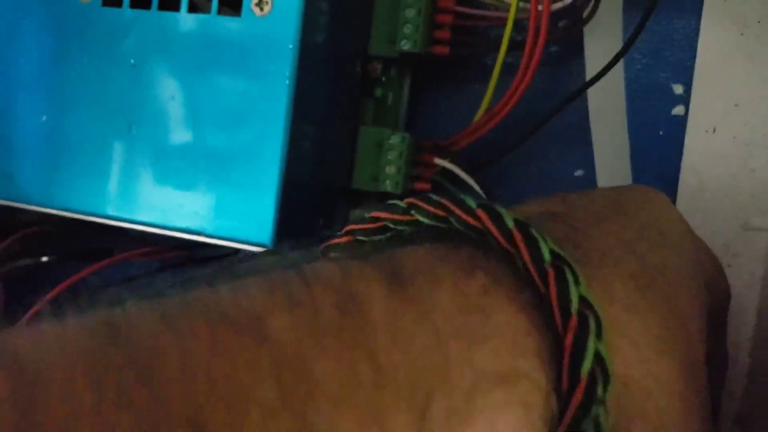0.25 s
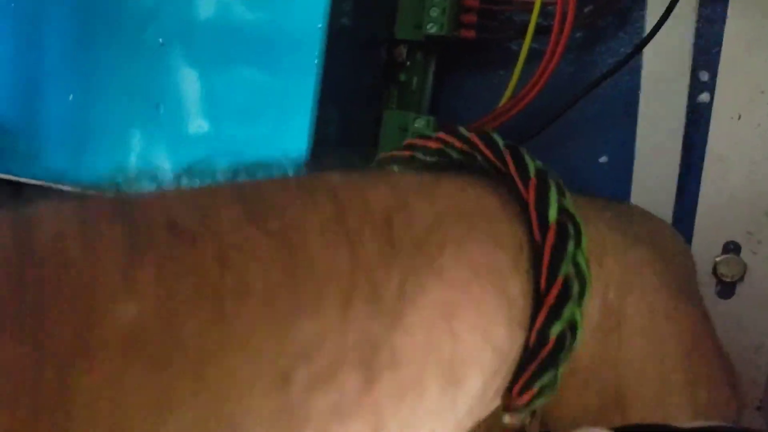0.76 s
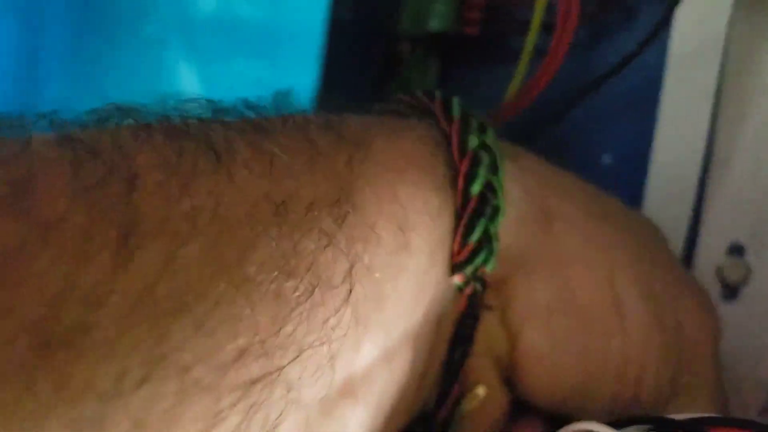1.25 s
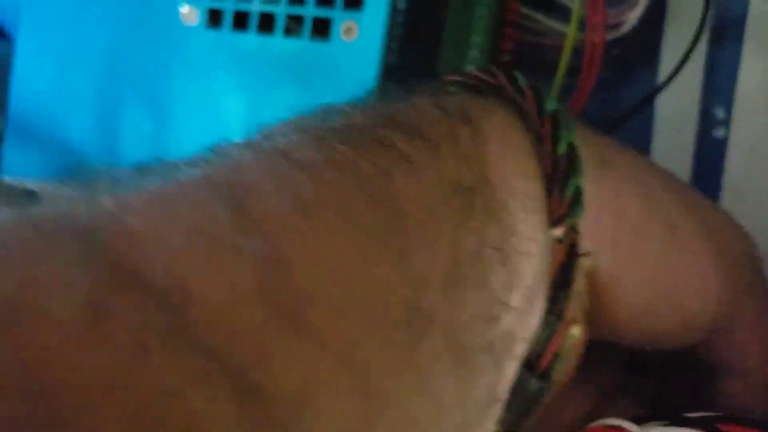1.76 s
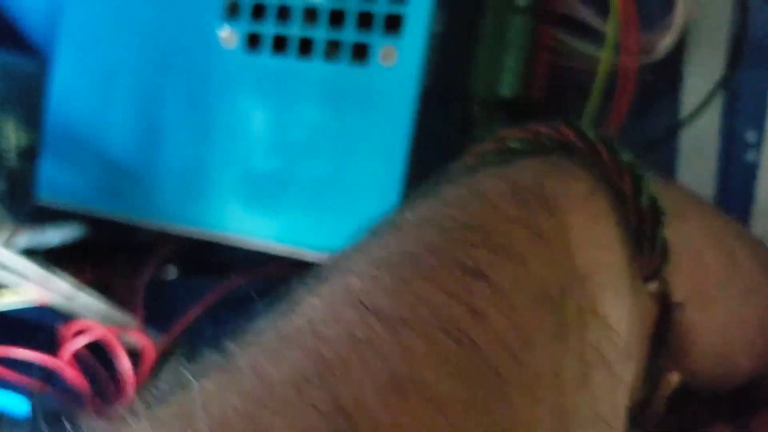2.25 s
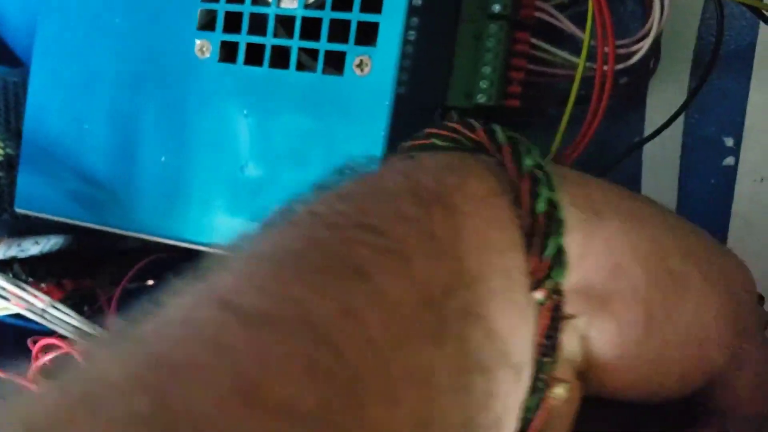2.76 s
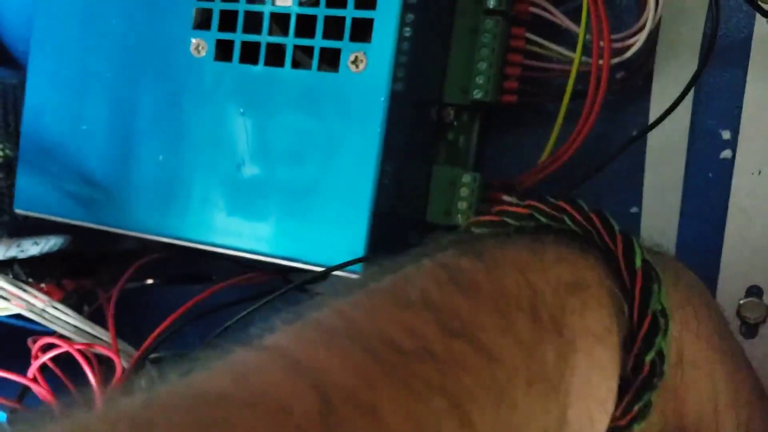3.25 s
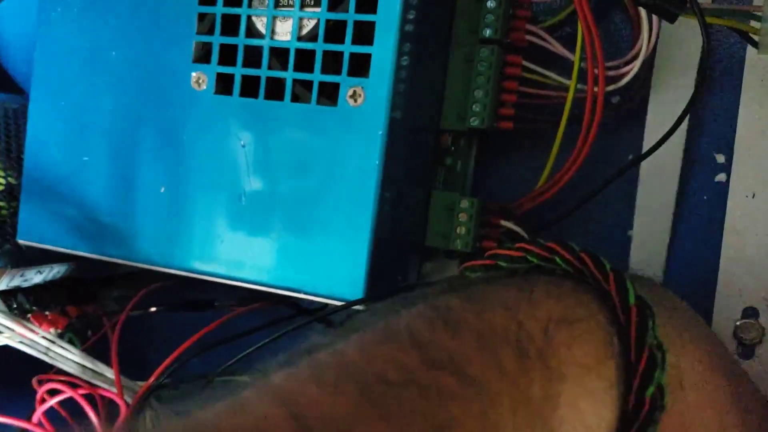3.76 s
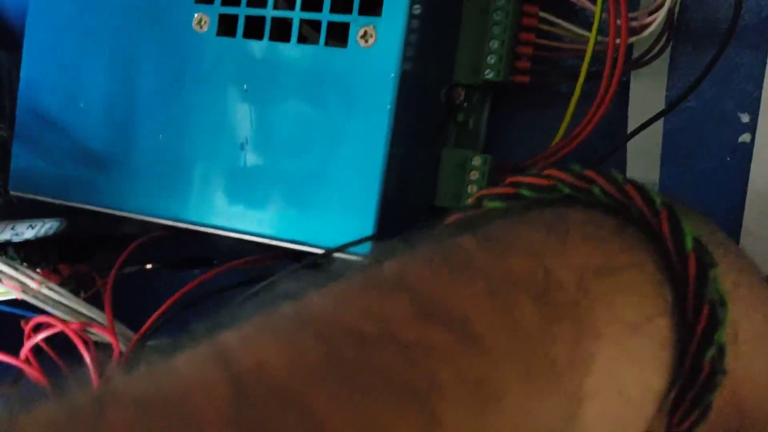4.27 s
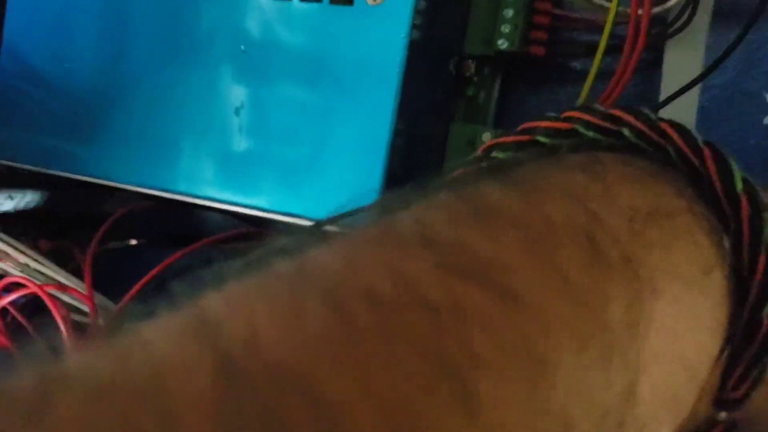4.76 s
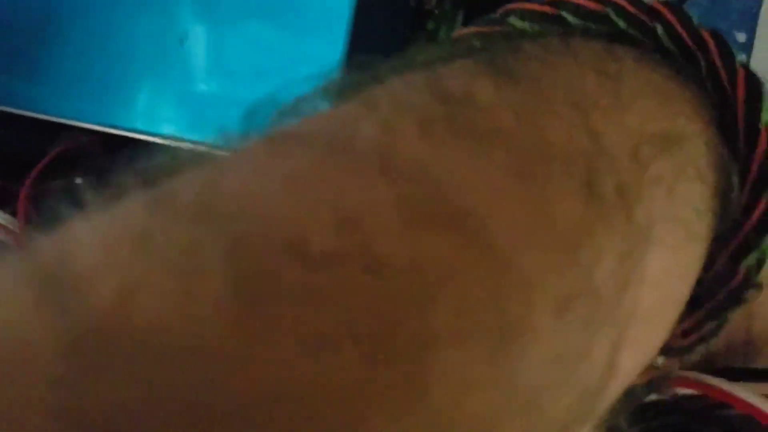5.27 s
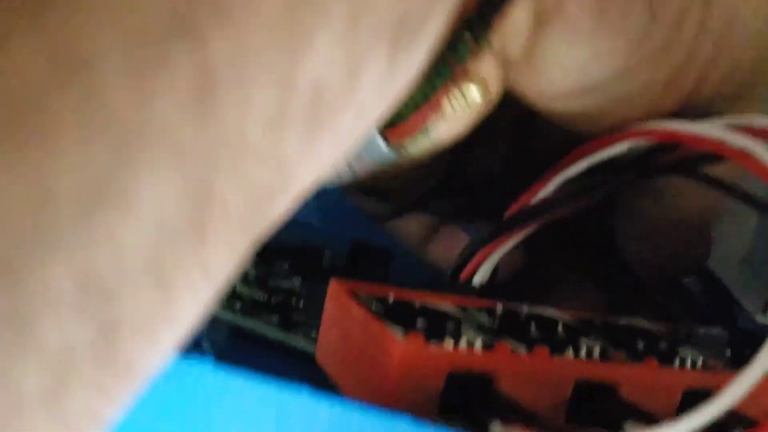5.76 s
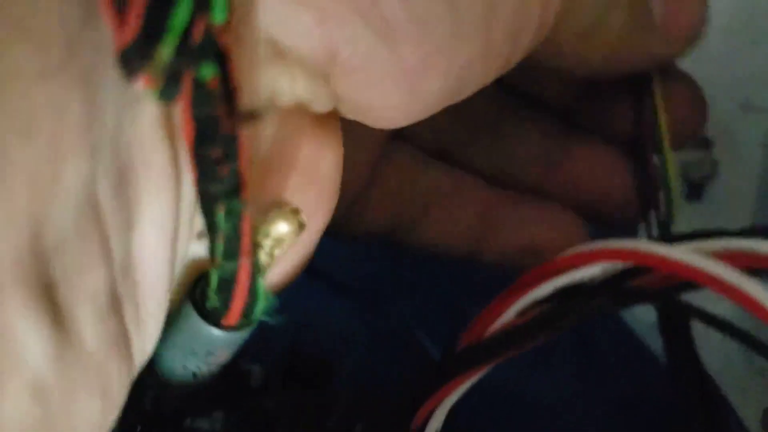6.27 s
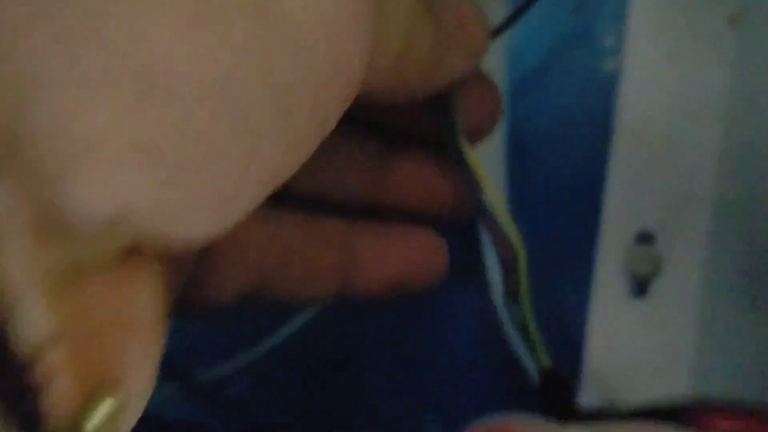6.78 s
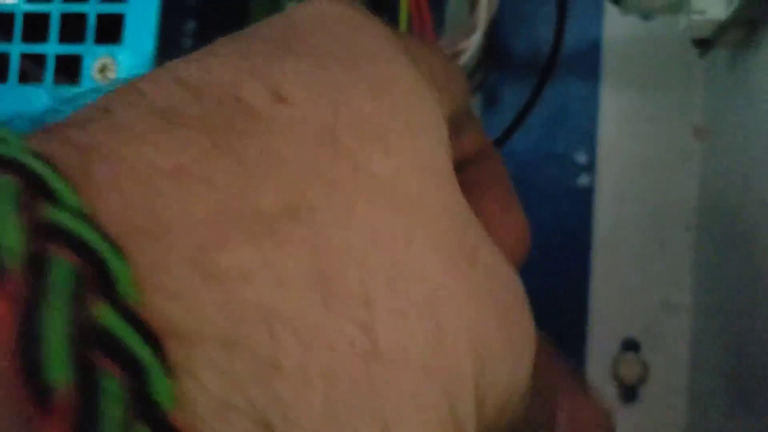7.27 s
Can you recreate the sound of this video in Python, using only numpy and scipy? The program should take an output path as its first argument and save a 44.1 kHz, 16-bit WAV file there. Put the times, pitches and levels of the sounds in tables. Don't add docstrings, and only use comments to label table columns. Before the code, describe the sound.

Very close stereo handling noise inside a hollow sheet-metal case. A hard plug slam comes early, then sparse clacks, soft shoves, wire ticks and cable rustle. Activity thickens after four and a half seconds into loud clacks and metallic knocks, peaking just before six, then thins to faint touches. Far engines hum low under slight hiss.

```python
import sys
import numpy as np
from scipy import signal
from scipy.fft import rfft, irfft, next_fast_len
from scipy.io import wavfile
from scipy.ndimage import uniform_filter1d, map_coordinates

SR = 44100
rng = np.random.default_rng(int(sys.argv[2]) if len(sys.argv) > 2 else 0)


def attenuation_scalar(level_db):
    decades = np.asarray(level_db, float) / 20
    return 10 ** decades


def pcm_store(signal):
    levels = np.round(np.clip(np.atleast_2d(signal), -1, 1) * 32767)
    wavfile.write(sys.argv[1], SR, levels.astype(np.int16).T)


N = 331632


def unit(x):
    return x / np.sqrt(np.mean(x ** 2) + 1e-20)


def along(points, hz):
    f, v = np.transpose(points)
    return np.interp(np.log(hz + 1), np.log(f + 1), v)


def curves(rows):
    s, *cols = np.transpose(rows)
    return [np.interp(np.arange(N) / SR, s, c) for c in cols]


def wobble(rate):
    knots = rng.standard_normal(int(N * rate / SR) + 4)
    return map_coordinates(knots, [np.arange(N) * rate / SR])


def filtered(x, response):
    n = x.shape[-1]
    m = next_fast_len(n + 2048)
    return irfft(rfft(x, m) * response(np.fft.rfftfreq(m, 1 / SR)), m)[..., :n]


def body(modes, bed, spread_db=0):
    gains = attenuation_scalar(spread_db * rng.standard_normal(len(modes)))

    def response(f):
        total = attenuation_scalar(along(bed, f))
        for k, (gain, (hz, width, db)) in enumerate(zip(gains, modes)):
            peak = 1j * f * width / (hz * hz - f * f + 1j * f * width)
            total = total + (-1) ** k * gain * attenuation_scalar(db) * peak
        return total
    return response


def ports(force, response, alike, lead_s):
    a, b = force * rng.standard_normal((2, len(force)))
    turn = np.arccos(np.clip(alike, 0, 1)) / 2
    pair = np.cos(turn) * a + np.sin(turn) * np.array([b, -b])
    sides = np.array([[1], [-1]])
    return filtered(pair, lambda f: response(f) * np.exp(1j * np.pi * f * lead_s * sides))


def lean(db):
    return attenuation_scalar([[db / 2], [-db / 2]])


# t/s, share of the full lead at the left port
HAND_PLACE = [
    (0, .2),
    (.7, 1),
    (1.2, .3),
    (2.2, .1),
    (4.2, .1),
    (5, .9),
    (5.8, 1),
    (6.3, .5),
    (7.5, .3),
]


def hand_share(s):
    return np.interp(s, *np.transpose(HAND_PLACE))


def contact(out, s, db, hz, fade, pan_db, modes, bed, alike, lead_s, crack, focus_db,
            rise=.0022, slope_db=2.5, swell=0, size=SR // 5):
    t = np.arange(size) / SR
    bumps = np.repeat(rng.standard_normal(size // 60 + 1), 60)[:size]
    shape_db = -60 * np.maximum(t - swell, 0) / np.clip(fade, .01, .25)
    shape_db -= 33 * np.maximum(swell - t, 0) / (swell + 1 / SR)
    force = attenuation_scalar(shape_db + 3.35 * bumps) * (1 - np.exp(-t / rise)) ** 2
    force += crack * attenuation_scalar(-60 * t / 0.015)
    ring = body(modes, bed, spread_db=1.9)

    def focused(f):
        away = np.log((f + 1) / hz)
        return ring(f) * attenuation_scalar(focus_db * np.exp(-(away / 0.12) ** 2) - slope_db * abs(away))
    part = ports(force, focused, alike, lead_s * hand_share(s))
    peak = np.sqrt(uniform_filter1d(np.mean(part ** 2, 0), size=130).max())
    start = round((s - .3 * rise - swell) * SR)
    out[:, start:start + size] += attenuation_scalar(db - 7.0) * part / peak * lean(pan_db)


# f/Hz, width f/Hz, level/dB
METAL = [(577, 18, -12), (596.7, 22, -3.5), (760, 47, -0.5), (793, 12, -6.5), (807, 23, -9.5),
         (874, 49, 3.5), (957, 29, -8.5), (1071, 18, 4), (1180, 280, -6), (1266, 78, 2), (1340, 140, -16.5),
         (1618, 62, -13.5)]
# f/Hz, level/dB
METAL_BED = [(250, -39.5), (450, -1.5), (800, -2.5), (1600, -10), (2500, -31.5)]
# f/Hz, width f/Hz, level/dB
BOOM_MODES = [(167, 27, -16.5), (220.5, 15, 3.5), (254, 38, -2.5), (300.2, 26, 3), (393, 31, -9.5)]
# f/Hz, level/dB
BOOM_SMOOTH = [(90, -36), (200, -8.5), (350, -18), (700, -57)]
# t/s, peak level/dB, loudest f/Hz, fade by 60 dB t/s, boom level/dB re peak
PANEL_KNOCKS = [(0.42, -38, 760, 0.13, 0), (1.563, -41, 1020, 0.28, 3.5), (1.672, -28, 902, 0.12, -11.5),
                (2.446, -37.5, 1180, 0.3, -3.5), (3.186, -37.5, 748, 0.1, -2), (3.56, -48, 1350, 0.13, -29),
                (3.899, -42.5, 799, 0.085, -6), (4.083, -48, 766, 0.13, 1.5),
                (4.355, -46.5, 880, 0.31, 4.5), (4.501, -43.5, 770, 0.11, 5), (4.614, -39.5, 988, 0.12, -6),
                (4.771, -43.5, 746, 0.032, -4), (5.035, -45.5, 1324, 0.086, -18),
                (5.201, -41, 743, 0.057, -1), (5.472, -27.5, 740, 0.15, -2), (5.547, -36, 813, 0.09, -13.5),
                (5.701, -30, 1464, 0.15, -5), (5.749, -32, 727, 0.27, -6), (5.844, -40, 724, 0.028, -2.5),
                (6.295, -37.5, 1000, 0.1, -1.5), (6.329, -37, 1130, 0.14, -3),
                (6.914, -51, 780, 0.063, -22)]
# t/s, peak level/dB, fade by 60 dB t/s, first bounce loss level/dB,
# boom level/dB re peak
PLUG_SLAMS = [
    (0.646, -25, 0.023, 1.5, -10),
    (5.113, -23, 0.05, 1.5, -4),
]


def knocks(out):
    bounce_s, slam_hz = .0155, 1000
    blows = list(PANEL_KNOCKS)
    for s, db, fade, loss_db, boom_db in PLUG_SLAMS:
        for k in range(3):
            blows.append((s + k * bounce_s, db - loss_db * k * k, slam_hz, fade, boom_db))
    for s, db, hz, fade, boom_db in blows:
        contact(out, s, db, hz, fade, 5.0, METAL, METAL_BED, .96, .00012, .7, 3.0)
        contact(out, s, db + boom_db + 0.5, 260, fade, 4.5, BOOM_MODES, BOOM_SMOOTH, .98, .0001, .2, 0)


# f/Hz, width f/Hz, level/dB
PLASTIC_MODES = [(1532, 24, -4.5), (1890, 110, -2.5), (2120, 110, -6.5), (2306, 26, -2), (2380, 66, -7),
                 (2562, 120, -1.5), (2651, 210, -9.5), (2894, 33, -1), (3460, 190, -15.5),
                 (3920, 330, -5.5), (4534, 180, -16.5)]
# f/Hz, level/dB
PLASTIC_SMOOTH = [(800, -21.5), (1500, -10), (3000, -10), (5000, -18.5), (8000, -27)]
# t/s, peak level/dB, loudest f/Hz
PLUG_CLACKS = [(0.052, -46, 2400), (0.07, -46, 1900), (6.838, -60, 1600), (7.287, -54, 1700),
               (2.408, -43.5, 2500), (2.482, -44.5, 1700), (2.3407, -54, 1600), (2.3502, -47, 2480),
               (2.676, -54.5, 2380), (5.4254, -34.5, 2230), (0.3547, -47, 2060), (0.422, -43, 2100),
               (0.6525, -22.5, 1842), (0.6654, -34.5, 2200), (0.797, -38, 2770), (0.819, -42, 2820),
               (1.5613, -39.5, 2400), (1.667, -28, 2360), (1.6836, -30.5, 2620), (2.4656, -41, 2400),
               (3.182, -44.5, 2120), (3.2539, -43.5, 2860), (3.7737, -54, 2060), (3.902, -52, 2470),
               (4.8112, -44, 2490), (5.0729, -35, 2450), (5.1994, -34.5, 1940), (5.5253, -29.5, 1890),
               (6.0792, -36.5, 2205), (6.2898, -35, 2150), (6.4638, -44.5, 2580), (6.6316, -48, 3620)]
# t/s, peak level/dB, loudest f/Hz, fade by 60 dB t/s,
# wire level/dB re peak
PLUG_SNAPS = [(0.6462, -16.5, 1723, 0.046, -4.5), (0.7185, -32, 2335, 0.036, -0.5),
              (2.3803, -38, 2550, 0.15, -7.5), (2.4438, -38, 2546, 0.23, -5.5),
              (2.5645, -40, 2460, .05, -4.5), (3.44, -37.5, 3100, 0.039, 0),
              (3.5615, -34, 2860, 0.033, -4.5), (4.6135, -29.5, 2770, .07, -8),
              (4.9065, -41.5, 2050, 0.056, -16.5), (5.0369, -27.5, 2520, 0.085, -8.5),
              (5.113, -19.5, 2490, 0.1, -6.5), (5.125, -23, 2970, 0.037, 0), (5.55, -29, 2715, .065, -9.5),
              (5.698, -12, 2560, 0.034, -5.5), (5.845, -37.5, 3380, 0.045, -3.5),
              (6.034, -35.5, 1960, 0.088, -3.5), (6.32, -34, 2050, 0.13, -5),
              (6.9133, -51.5, 2464, .085, -7)]


def clacks(out):
    hits = [(s, db, hz, .066) for s, db, hz in PLUG_CLACKS] + [row[:4] for row in PLUG_SNAPS]
    for s, db, hz, fade in hits:
        contact(out, s, db, hz, fade, .3, PLASTIC_MODES, PLASTIC_SMOOTH, .7, .00039, .95, 3.5, size=SR // 8)


# t/s, peak level/dB, loudest f/Hz, fade by 60 dB t/s
LIGHT_TOUCHES = [
    (0.639, -28, 1650, 0.066),
    (0.651, -20, 1200, 0.053),
    (0.668, -25, 1430, 0.049),
    (5.119, -23.5, 1455, .08),
    (5.674, -26.5, 4970, 0.12),
    (6.017, -39, 4400, 0.14),
]


def touches(out):
    modes = METAL[8:] + PLASTIC_MODES
    for s, db, hz, fade in LIGHT_TOUCHES:
        contact(out, s, db, hz, fade, 3.0, modes, PLASTIC_SMOOTH, .85, .0001, .3, 9.0)


# f/Hz, width f/Hz, level/dB
WIRE_MODES = [(5930, 170, -20.5), (6100, 330, 0.5), (7400, 1600, -12.5), (10000, 170, -0.5),
              (12500, 1900, -8), (15200, 3000, -5.5)]
# f/Hz, level/dB
WIRE_SMOOTH = [(2500, -33.5), (5000, -5), (8500, -12.5), (12000, -9), (16000, -47)]
# t/s, peak level/dB, loudest f/Hz
WIRE_TICKS = [(1.4038, -50, 15280), (1.4648, -48.5, 11800), (1.4872, -38.5, 12900), (1.5573, -43, 4650),
              (1.668, -35, 10000), (3.1185, -36, 12800), (4.0179, -39, 13000), (3.98, -55, 12000),
              (4.0422, -45, 11900), (4.0835, -47, 12000), (5.699, -26, 8500), (6.327, -42, 6500),
              (4.0642, -45.5, 12500), (4.083, -46.5, 5740), (4.099, -53, 6100), (4.1203, -51.5, 14780),
              (4.208, -51, 13160), (4.2484, -43.5, 11980), (4.341, -49, 14000), (4.578, -40, 4840),
              (5.0712, -29, 11860), (5.081, -33, 9000), (3.455, -51.5, 12000), (5.681, -41.5, 5070),
              (6.0153, -43.5, 14350), (6.2847, -39.5, 7600), (6.4629, -40, 15200), (6.877, -60.5, 6000),
              (7.286, -57.5, 6000), (7.3671, -56.5, 11500)]


def ticks(out):
    taps = [(s, db, hz, 0.016, 8.5) for s, db, hz in WIRE_TICKS]
    taps += [(s, db + wire_db, 5500, 0.7 * fade, 9.5) for s, db, hz, fade, wire_db in PLUG_SNAPS]
    for s, db, hz, fade, slope_db in taps:
        contact(out, s, db, hz, fade, 6.0, WIRE_MODES, WIRE_SMOOTH, .7, .0004 * rng.random(), .6, 4.0,
                rise=0.0018, slope_db=slope_db, size=SR // 10)


# t/s, plastic peak level/dB, fade by 60 dB t/s, panel level/dB re peak,
# wire level/dB re peak
HAND_SHOVES = [(0.06, -44, 0.16, -2, -9), (0.2797, -46, 0.13, -5, -31), (0.85, -41, 0.35, -1.5, -7.5),
               (1.256, -50.5, 0.21, 4.5, -1.5), (1.445, -60, .24, 5.5, 4.5), (2.0572, -58, 0.26, 4.5, -8),
               (2.352, -47, 0.18, 3.5, -6.5), (2.6384, -54.5, 0.2206, 11, -10),
               (2.7443, -47, 0.14, -14, -10), (2.9647, -50.5, 0.15, 8.5, -4),
               (3.0684, -51.5, 0.0977, 0, -6), (3.3851, -64, 0.0926, 20.5, -18.5),
               (3.9197, -45, 0.72, -5.5, -5.5), (4.2496, -55, 0.27, 10.5, -3), (4.3522, -53, 0.25, 5.5, -4),
               (4.588, -38, 0.22, -0.6, -8.5), (5.3338, -45, 0.42, 5.5, -5), (5.42, -32.5, 0.32, 1.9, -18),
               (5.472, -32.5, 0.11, -12.5, -3), (5.9866, -49.5, 0.28, -2.5, -21),
               (6.0469, -30.5, 0.13, -5, -14.5), (6.8417, -58, 0.071, 10, -9), (7.2853, -49, 0.1, 2.5, -4),
               (7.4898, -58, 0.15, 2.5, -0.5)]


def shoves(out):
    for s, db, fade, panel_db, wire_db in HAND_SHOVES:
        swell = .03 + .12 * fade
        contact(out, s, db, 2400, fade, .3, PLASTIC_MODES, PLASTIC_SMOOTH, .7, .00036, 0, 2.5, swell=swell)
        contact(out, s, db + panel_db, 800, fade, 3.5, METAL + BOOM_MODES, METAL_BED, .94, .00012, 0, 2.2,
                swell=swell)
        contact(out, s, db + wire_db, 5800, fade, 4.0, WIRE_MODES, WIRE_SMOOTH, .55, .0002, 0, 1.5,
                swell=swell, size=SR // 6)


def contacts():
    out = np.zeros((2, N + SR))
    for play in (knocks, clacks, touches, ticks, shoves):
        play(out)
    return out[:, :N]


# t/s, peak level/dB, f/Hz, fade by 60 dB t/s
CLEAN_RINGS = [(0.649, -22, 813, .12), (0.662, -26, 822, .07), (0.677, -22, 821, .045),
               (0.657, -22.5, 1413, 0.093), (0.66, -32, 1263, 0.071), (0.655, -26, 2216, .1),
               (0.65, -36, 307, 0.12), (0.699, -35, 811, .07), (0.054, -52, 4700, .04),
               (0.06, -46, 1500, .05), (0.068, -47, 1200, .07), (0.672, -27, 1427, .06),
               (2.73, -58, 3700, .15), (0.7176, -32.5, 6100, 0.038), (1.668, -44, 10000, .04),
               (2.058, -49, 770, 0.087), (3.19, -36.5, 735, 0.062), (3.561, -38, 2822, 0.03),
               (3.901, -42, 740, 0.08), (3.901, -39, 814, 0.086), (3.918, -52, 5250, 0.068),
               (4.079, -52, 5800, .05), (4.355, -53, 6220, 0.059), (1.561, -42.5, 205, 0.28),
               (1.25, -49.5, 215, 0.22), (5.701, -25.5, 2200, .07), (5.703, -30, 2200, .06),
               (5.117, -30, 781, .16), (5.14, -32, 495, 0.16), (5.118, -23, 1692, .07),
               (5.13, -30, 301, 0.33), (5.418, -37.5, 2750, 0.053), (5.473, -36.5, 793, 0.063),
               (5.551, -36, 2717, 0.032), (5.676, -36, 4930, .04), (5.5, -40, 2665, .04),
               (5.78, -42.5, 240, .3), (6.3, -46, 225, .25), (6.29, -46, 300, 0.26)]


def rings():
    out, t = np.zeros((2, N + SR)), np.arange(SR // 4) / SR
    for s, db, hz, t60 in CLEAN_RINGS:
        drift = np.cumsum(rng.standard_normal(len(t))) * (.012 + hz * 6e-6)
        lead = np.pi * hz * hand_share(s) * .0002 * np.array([[1], [-1]])
        envelope = attenuation_scalar(db - 60 * t / t60) * (1 - np.exp(-t / 0.0012))
        start = round(s * SR)
        out[:, start:start + len(t)] += np.sin(2 * np.pi * hz * t + drift + lead) * envelope * lean(4.4)
    return out[:, :N]


# t/s, hand pressure level/dB, slide speed as brightness level/dB
CABLE_DRAG = [(0.0, -50, -2), (0.27, -66, 3), (0.79, -44.5, -0.5), (1.03, -56, -1), (1.32, -77.5, 0),
              (1.63, -45, 6.5), (1.84, -63.5, 3.5), (2.34, -69, -10.5), (2.48, -52, -4), (2.74, -73, 4.5),
              (3.2, -57.5, -1), (3.68, -69, -8), (4.59, -55.5, 1.5), (5.61, -43.5, -1.5), (6.14, -72.5, 0),
              (6.51, -53.5, -0.5), (6.7, -72, -0.5), (7.52, -85.5, 13)]


def drag():
    panel_db, speed_db = curves(CABLE_DRAG)
    press_db = panel_db + 52
    plastic_db = -60.5 + 1.08 * press_db + speed_db
    wire_db = -71 + 0.71 * press_db + speed_db
    catches = np.clip(3 * wobble(11) + 3 * wobble(40) + 3 * wobble(250), -12, 10)

    def rub(modes, bed, grip, alike, lead_s):
        return unit(ports(attenuation_scalar(grip * catches), body(modes, bed), alike, lead_s))
    metal = rub(METAL, METAL_BED, .9, .93, .0001)
    metal += attenuation_scalar(-5 + 2.5 * wobble(4)) * rub(BOOM_MODES, BOOM_SMOOTH, .7, .96, .0001)
    near = rub(PLASTIC_MODES[:6], PLASTIC_SMOOTH, 0.31, 0.36, 0.00014)
    far = rub(PLASTIC_MODES[4:], PLASTIC_SMOOTH, 0.36, 0.35, 0.00005)
    spot = np.pi / 4 + 1.0 * wobble(6.9)
    sound = attenuation_scalar(panel_db - 4.5) * metal
    sound += attenuation_scalar(plastic_db) * (np.cos(spot) * near + np.sin(spot) * far)
    sound += attenuation_scalar(wire_db) * rub(WIRE_MODES, np.add(WIRE_SMOOTH, [0, 6]), 0.61, 0.45, 0.00016)
    return sound * lean(3)


# t/s, length t/s, f/Hz, rms level/dB
SLEEVE_SQUEAKS = [(0.234, 0.08, 2860, -61.5), (0.379, 0.064, 2920, -62), (0.525, 0.06, 2900, -64),
                  (1.416, 0.091, 2720, -70), (1.72, 0.18, 6330, -77.5), (2.039, 0.049, 763, -61),
                  (2.631, 0.071, 44.3, -55), (2.87, 0.16, 2750, -67), (3.356, 0.053, 2580, -70),
                  (6.516, 0.11, 931, -67), (0.414, 0.088, 6000, -76), (2.039, 0.13, 2380, -74.5),
                  (4.699, 0.15, 2710, -64.5), (6.795, 0.17, 2475, -78)]
# t/s, length t/s, f/Hz, rms level/dB
SLEEVE_SWISHES = [(1.43, .055, 13060, -65.5), (1.51, .07, 14500, -61), (1.56, 0.21, 12160, -65.5),
                  (1.56, .12, 784, -55.5), (2.08, 0.1, 2540, -73), (2.335, .04, 4960, -62),
                  (2.6, .14, 4140, -74), (2.73, 0.042, 8070, -71.5), (3.12, 0.048, 12180, -70.5),
                  (3.12, 0.044, 4700, -65.5), (3.94, .12, 2450, -64.5), (3.91, 0.1, 7500, -69),
                  (4.66, 0.17, 5500, -67), (4.88, .14, 1100, -67.5), (5.33, 0.1, 2470, -56.5),
                  (5.44, .06, 2400, -52), (5.58, .1, 4970, -60.5), (6.1, 0.057, 1001, -64),
                  (6.04, .07, 2500, -48), (0.0, .03, 2500, -60), (0.11, .04, 4300, -66),
                  (0.52, .1, 6000, -72), (4.03, .12, 2200, -64), (7.28, 0.072, 1100, -72.5),
                  (6.38, .09, 2300, -61), (5.24, .1, 1900, -60), (5.58, .09, 1800, -51.5),
                  (0.03, .08, 2640, -59.5)]


def squeaks():
    out = np.zeros((2, N + SR))
    for rows, share, grain_db in ((SLEEVE_SQUEAKS, .15, 0), (SLEEVE_SWISHES, .7, 5.5)):
        for s, length, hz, db in rows:
            n, width = round(length * SR), share * hz + 18

            def mode(f):
                return (1j * f * width / (hz * hz - f * f + 1j * f * width)) ** 2
            grains = attenuation_scalar(grain_db * np.repeat(rng.standard_normal(n // 40 + 1), 40)[:n])
            force = np.pad(grains * np.hanning(n) ** 0.37, (0, 2000))
            start = round(s * SR)
            out[:, start:start + n + 2000] += attenuation_scalar(db) * unit(ports(force, mode, 0.58, 0.00015)) * lean(3)
    return out[:, :N]


# f/Hz, fade by 60 dB t/s
CASE_FADE = [(150, 0.85), (300, 0.56), (1000, 0.29), (3000, 0.19), (10000, 0.1)]
# f/Hz, likeness 0 to 1
CASE_LIKENESS = [(200, 0.9), (700, 0.77), (1500, 0.088), (4000, 0.047)]


def case(x):
    out, span = np.zeros((2, N + SR)), round(.47 * SR)
    for start in range(0, N, span):
        hz, t, z = signal.stft(rng.standard_normal((2, SR // 3)), SR, nperseg=256)
        alike = np.clip(along(CASE_LIKENESS, hz), 0, 1)[:, None]
        z = np.array([z[0], alike * z[0] + np.sqrt(1 - alike ** 2) * z[1]])
        fading = attenuation_scalar(-60 * t / along(CASE_FADE, hz)[:, None])
        tail = signal.istft(z * fading, SR, nperseg=256)[1]
        echo = signal.fftconvolve(x[:, start:start + span], tail / np.linalg.norm(tail[0]), axes=1)
        first = start + 150
        out[:, first:first + echo.shape[1]] += echo
    return out[:, :N]


def hum(hz, width_hz):
    pitch = hz + width_hz * 0.2 * wobble(5.5)
    return unit(attenuation_scalar(2.1 * wobble(6)) * np.sin(2 * np.pi * np.cumsum(pitch) / SR))


# t/s, slow engine level/dB, fast engine level/dB, rumble level/dB
ENGINES = [
    (0.0, -65, -58, -56),
    (2.34, -66, -54, -57),
    (3.64, -62.5, -70, -57.5),
    (4.15, -53.5, -61, -59.5),
    (4.75, -60.5, -63, -61.5),
    (5.6, -54.5, -66, -56.5),
    (6.12, -54, -57.5, -61),
    (7.52, -55, -79, -59),
]
# f/Hz, level/dB
RUMBLE_COLOR = [(20, -24.5), (42, 4), (71, 0.5), (128, -0.5), (180, -7), (320, -11), (450, -34), (700, -90)]
# f/Hz, level/dB per Hz
HISS_COLOR = [(120, -34), (200, -2), (305, -1), (601, -26), (2130, -27), (7970, -46.5), (13500, -32.5),
              (16000, -32)]


def background():
    slow_db, fast_db, rumble_db = curves(ENGINES)
    slow = attenuation_scalar(slow_db) * (hum(61, 3.6) + attenuation_scalar(-6.0) * hum(121.73, 6.7) + attenuation_scalar(-17.0) * hum(302, 8))
    fast = attenuation_scalar(fast_db) * (hum(88.7, 7.4) + attenuation_scalar(-19.5) * hum(160, 4.6))
    rumble = unit(ports(np.ones(N), lambda f: attenuation_scalar(along(RUMBLE_COLOR, f)), 0.92, 0))
    hiss = unit(ports(np.ones(N), lambda f: attenuation_scalar(along(HISS_COLOR, f)), 0.59, 0))
    low = (slow + fast + attenuation_scalar(rumble_db + 2.5) * rumble) * lean(2.6)
    return low + attenuation_scalar(-68.5 + 1.6 * wobble(4.1)) * hiss


def scene():
    hits, struck = contacts() + squeaks(), rings()
    echo = attenuation_scalar(-3.5) * case(hits + attenuation_scalar(-8.0) * struck)
    return hits + struck + echo + drag() + background()


def band_limit(x):
    return signal.sosfilt(signal.butter(12, 16830, fs=SR, output="sos"), x)


def record(dry):
    mix = filtered(dry, lambda hz: np.where(hz < 15750, 1, attenuation_scalar(-27.5)) * (hz < 16750))
    return band_limit(mix)


dry = scene()
out = record(dry)
pcm_store(out)
```